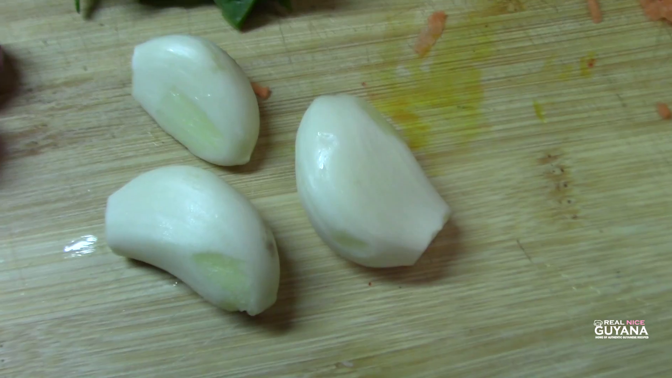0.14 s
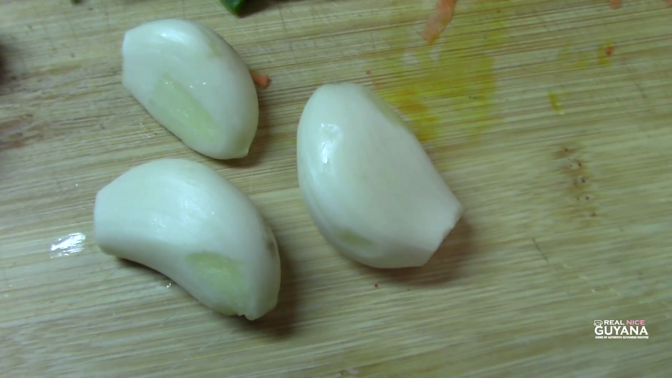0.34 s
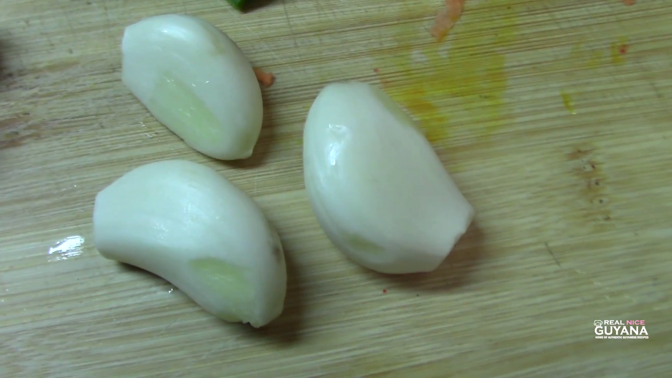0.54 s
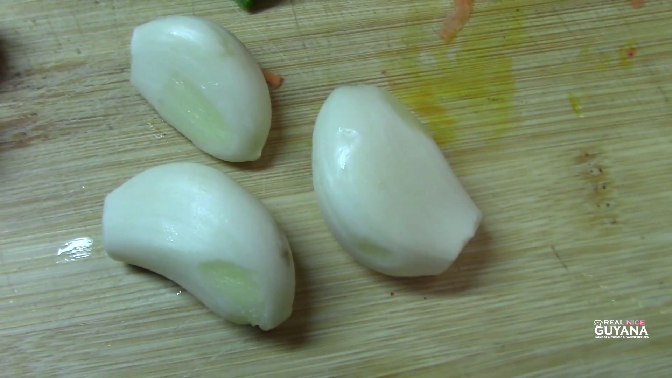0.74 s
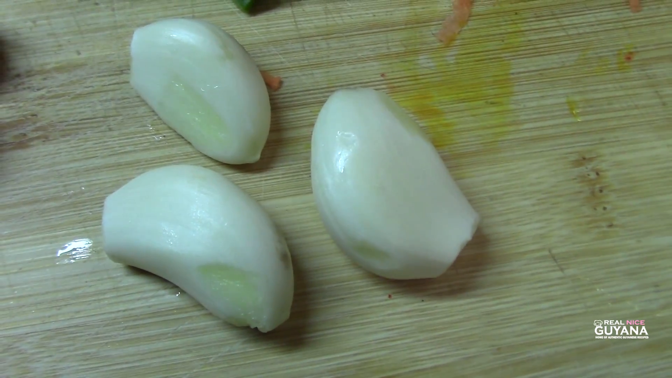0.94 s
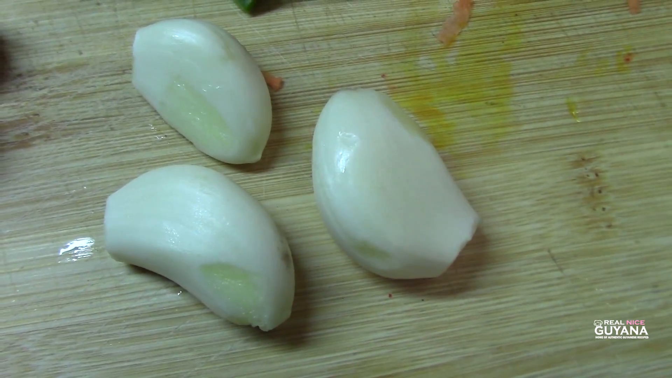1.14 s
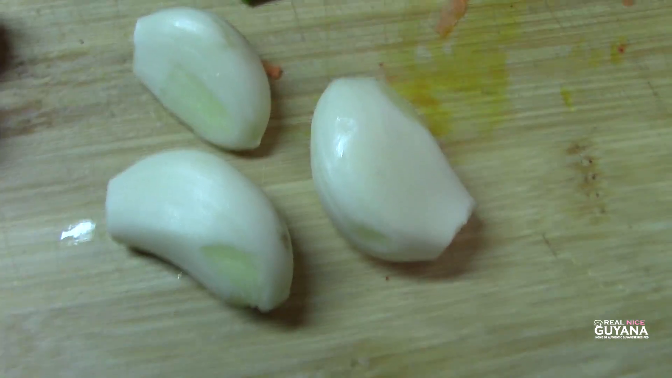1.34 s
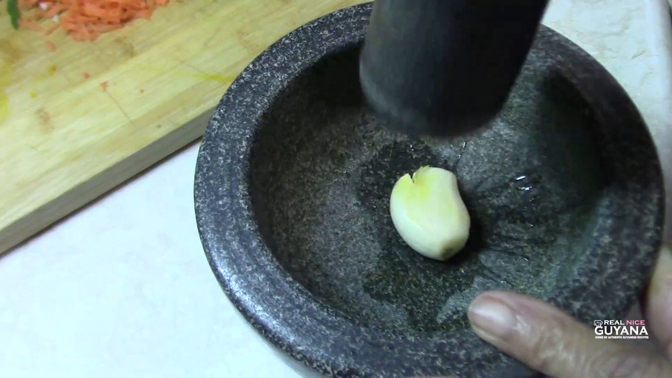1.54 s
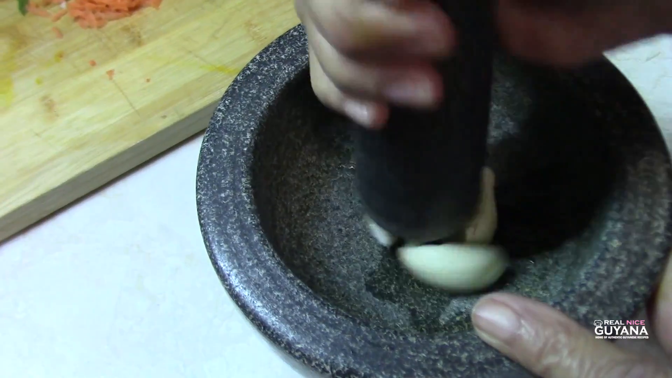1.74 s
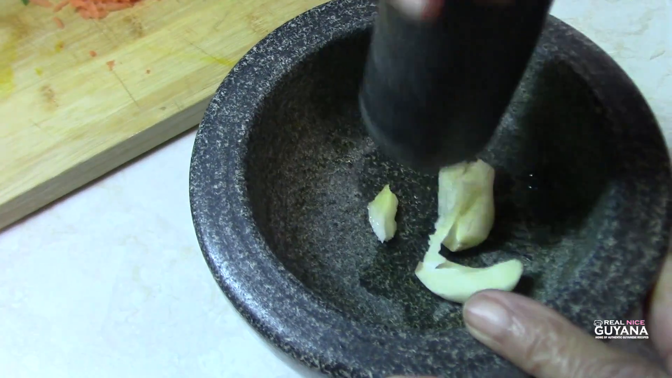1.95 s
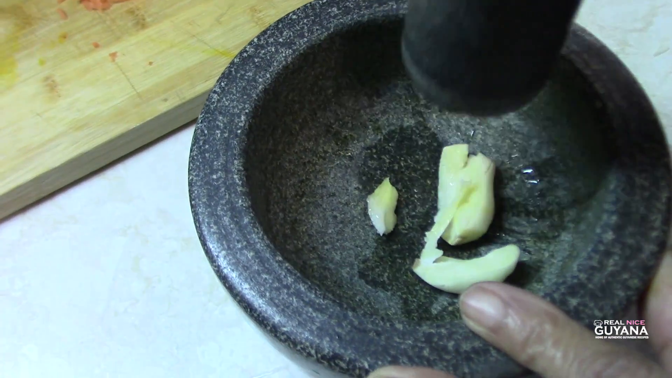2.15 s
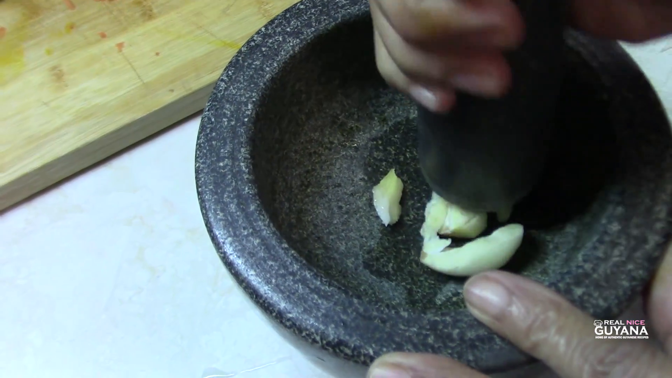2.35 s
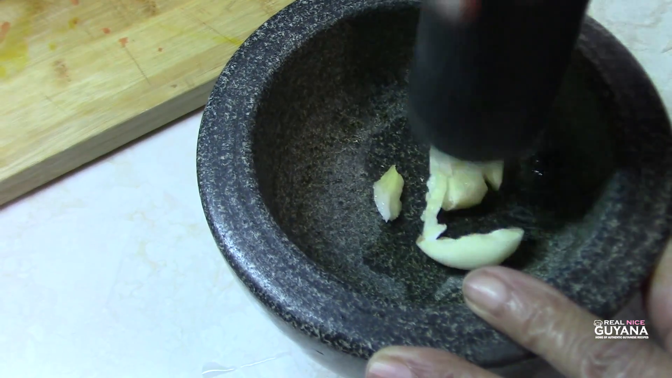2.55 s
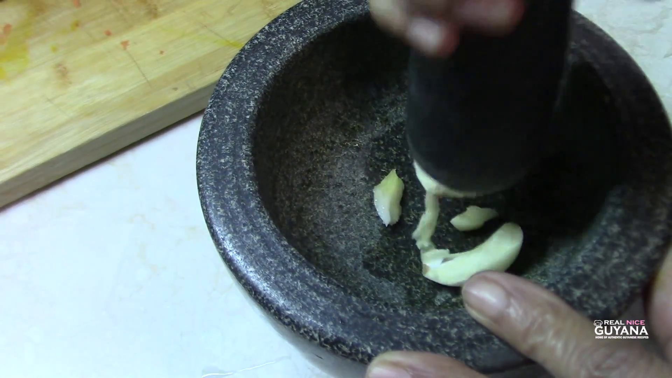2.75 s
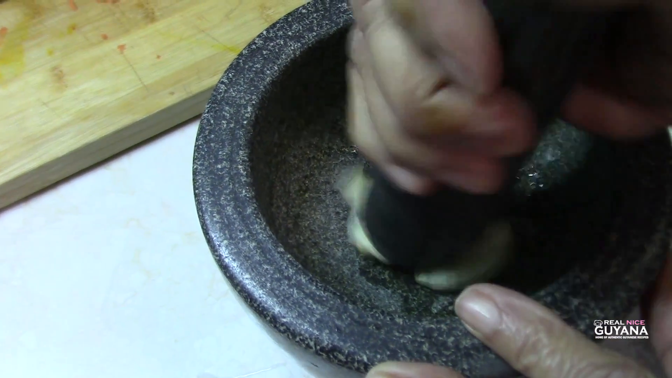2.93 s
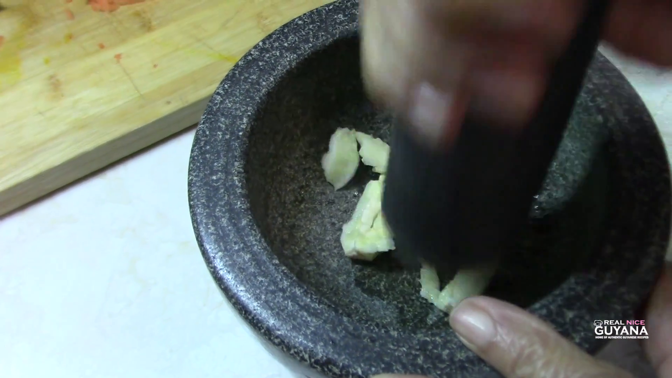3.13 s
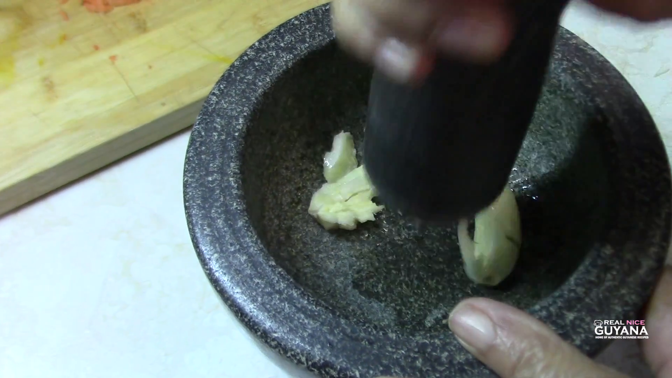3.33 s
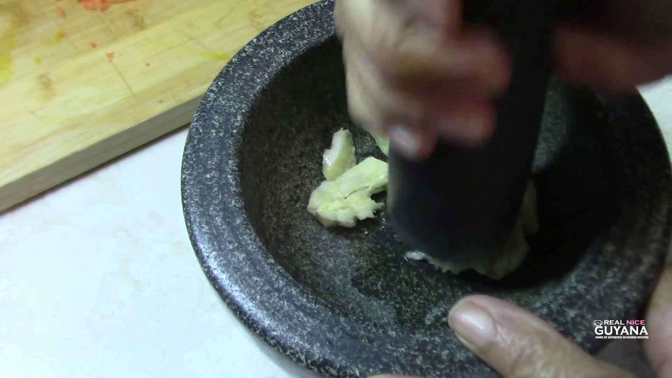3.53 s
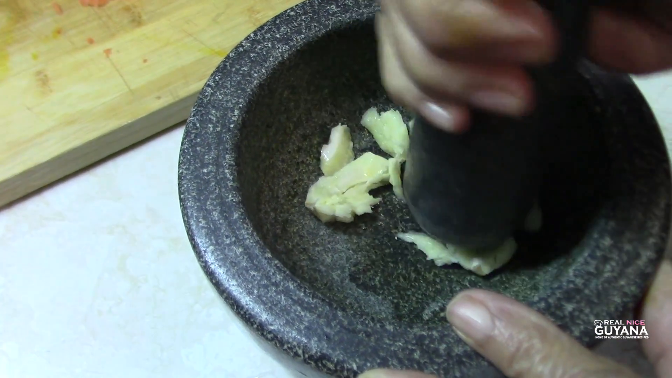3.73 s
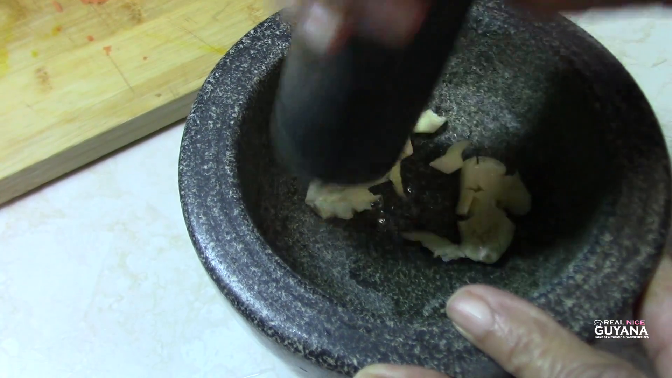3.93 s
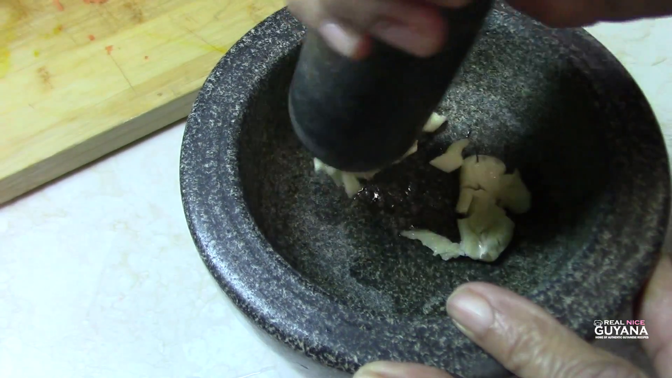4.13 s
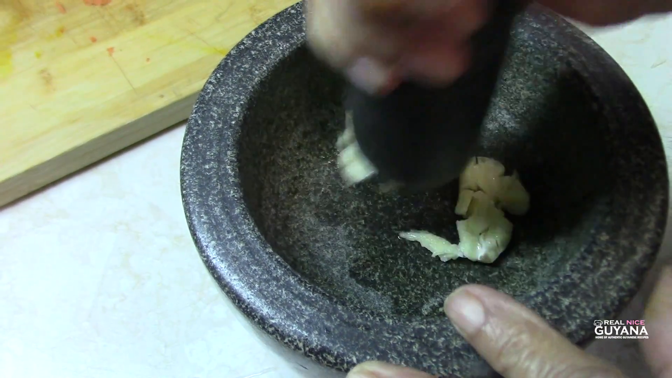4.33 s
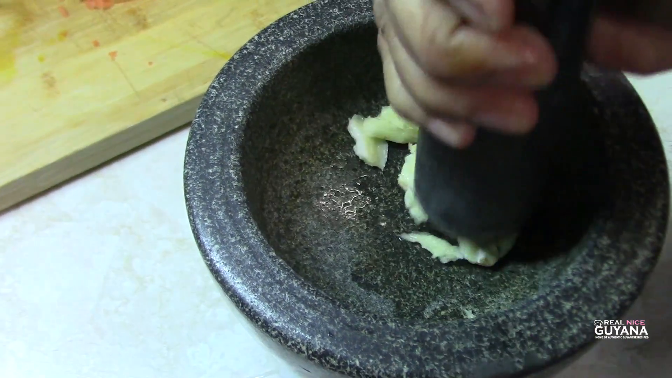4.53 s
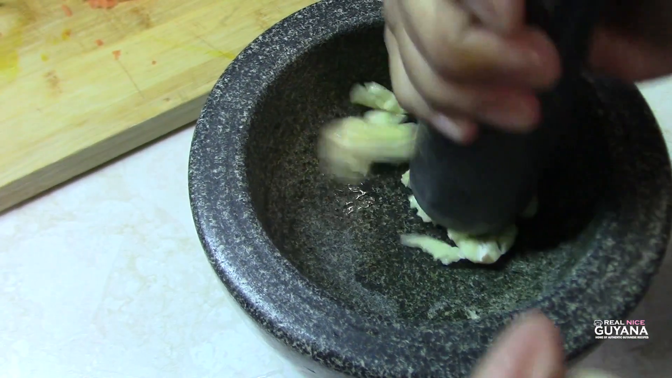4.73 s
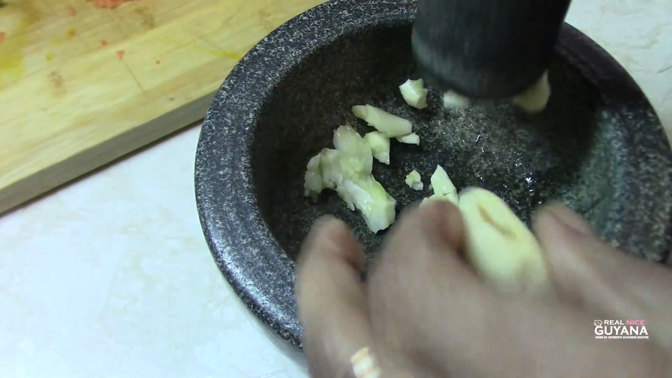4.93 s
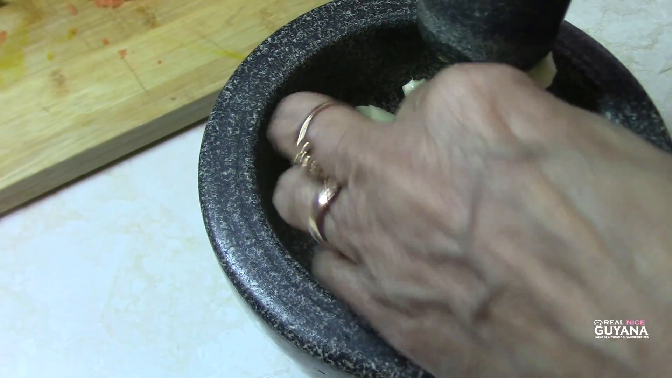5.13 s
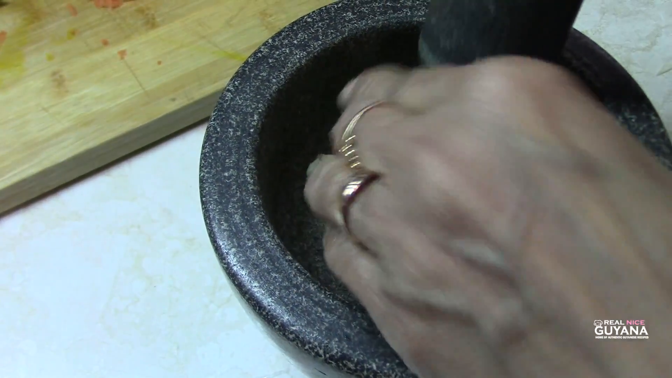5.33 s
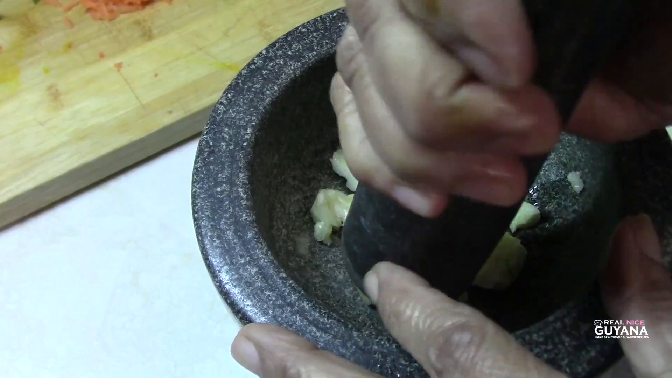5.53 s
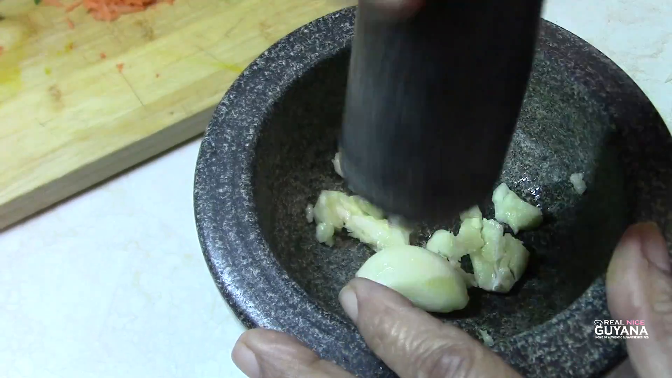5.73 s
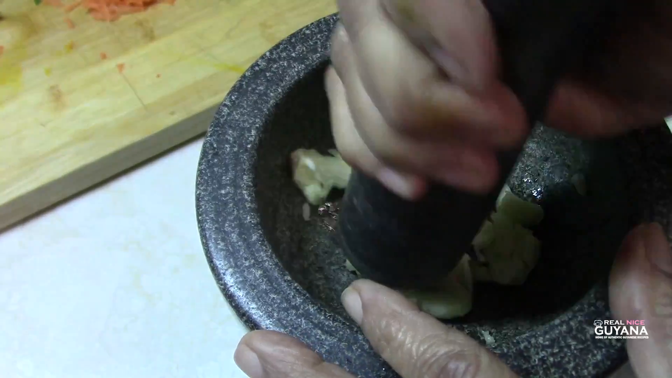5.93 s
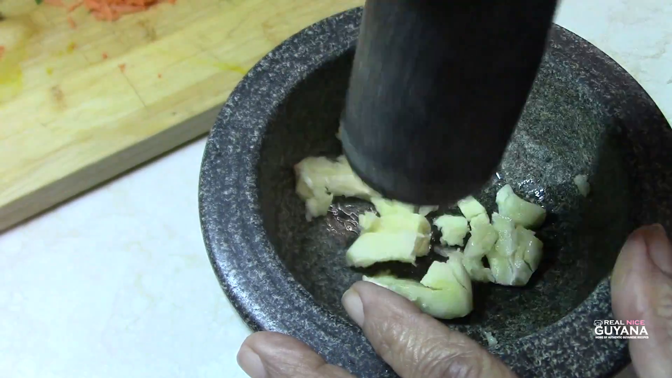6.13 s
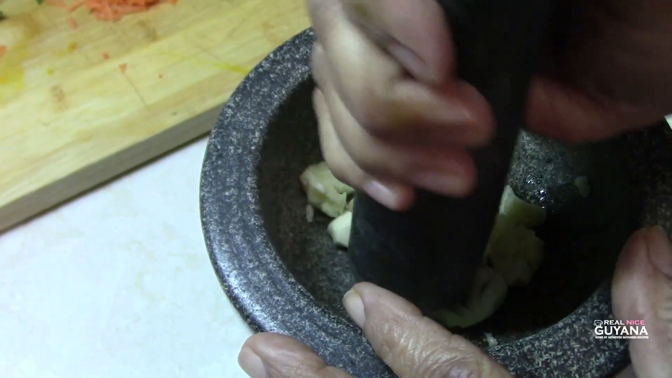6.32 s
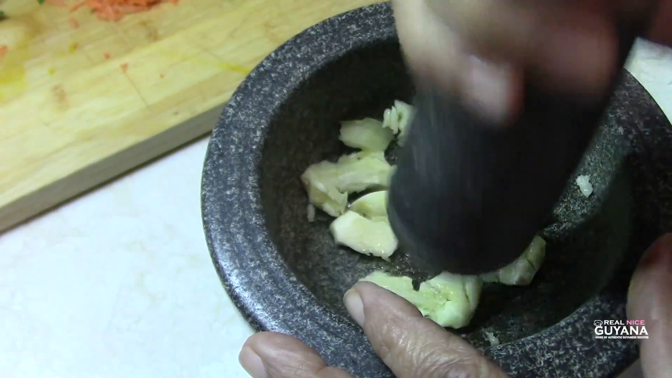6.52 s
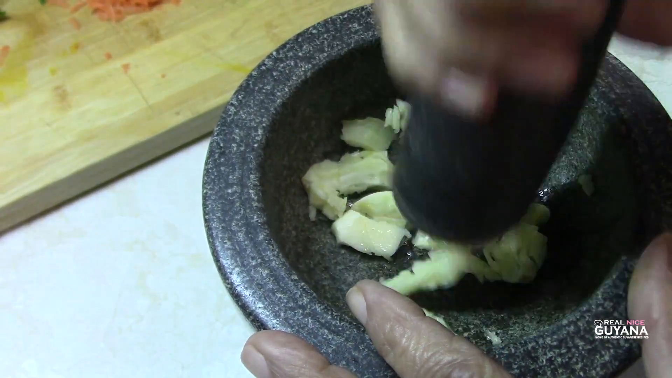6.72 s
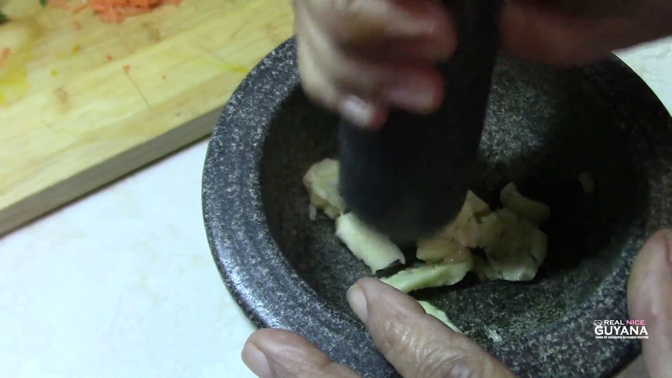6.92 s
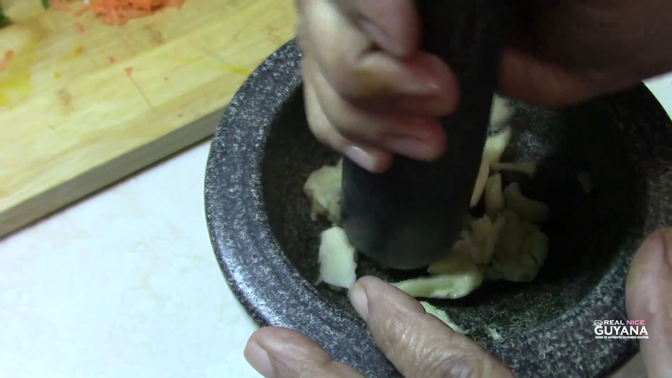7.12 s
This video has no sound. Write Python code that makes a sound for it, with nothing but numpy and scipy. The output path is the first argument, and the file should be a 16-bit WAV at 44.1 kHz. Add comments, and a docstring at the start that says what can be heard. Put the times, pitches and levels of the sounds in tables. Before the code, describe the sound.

A low kitchen hum runs throughout. For the first second and a half there are only small taps and, at about 0.5 seconds, a faint distant utensil clink. At 1.5 seconds a stone scrape starts abruptly, close to the microphone. From 1.8 seconds a stone pestle pounds garlic in a stone mortar roughly three times a second, with a slightly longer gap after the first blow. Each blow combines a crisp crack of pulp, a stone knock, a thud through the worktop and a short fading squelch, with a little dull room reverberation. Between blows the pestle drags grittily and makes the bowl ring briefly. Pulp crackles and a finger ring tinkles very faintly now and then. The pounding pauses after 4.8 seconds, and one dull knock on the worktop sounds at 5.4. Five more blows follow from 5.6 to about 7 seconds.

```python
"""Garlic pounded in a stone mortar on a kitchen worktop, close to a camera microphone.
The room hums; small taps and a far clink come first, and a scrape starts abruptly at 1.5 s. From 1.8 s
the stone pestle falls about three times a second: each blow cracks pulp, knocks stone, thuds into the
worktop and squelches away, and between blows the pestle drags and makes the bowl sing. Pulp crackles and
a finger ring tinkles. In a pause at 5.4 s comes one dull knock on the worktop, then five more blows."""
import sys
import numpy as np
from scipy import signal
from scipy.fft import rfft, irfft, next_fast_len
from scipy.io import wavfile
from scipy.ndimage import uniform_filter1d

SR = 44100
rng = np.random.default_rng(int(sys.argv[2]) if len(sys.argv) > 2 else 0)


def materialize(psi):
    """Save the field psi as 16-bit PCM at rate SR to the path in sys.argv[1].

    A 1-D psi becomes a single channel; in a 2-D psi each row is a channel.
    """
    bounded = np.clip(np.atleast_2d(psi).T, -1, 1)
    quanta = np.round(bounded * 32767).astype(np.int16)
    wavfile.write(sys.argv[1], SR, quanta)


N = 316197


def undb(db):
    return 10 ** (np.asarray(db) / 20)


def unit(x):
    return x / np.sqrt(np.mean(x ** 2))


def noise():
    return rng.standard_normal(N)


def colour(points):
    """Noise of rms 1 with a spectrum of (Hz, dB) points."""
    hz, db = np.transpose(points)
    size = next_fast_len(N)
    gain = undb(np.interp(np.log(np.arange(size // 2 + 1) * SR / size + 1), np.log(hz), db))
    return unit(irfft(rfft(rng.standard_normal(size)) * gain, size)[:N])


def band(x, hz, width, passes=1):
    """Two-pole resonance, gain 1 at the centre; more passes steepen it."""
    for _ in range(passes):
        x = signal.lfilter(*signal.iirpeak(hz, hz / width, SR), x)
    return x


def butter(x, order, hz, kind):
    return signal.sosfilt(signal.butter(order, hz, kind, fs=SR, output="sos"), x)


def flutter(rate, db):
    """Gain that wavers rate times a second."""
    step = int(SR / rate)
    steps = np.repeat(rng.standard_normal(N // step + 1), step)
    return undb(db * unit(uniform_filter1d(steps, step)[:N]))


def add(track, s, db, shape):
    """Lay a shape on a track from time s."""
    i = int(s * SR)
    track[i:i + len(shape)] += undb(db) * shape[:N - i]


def swell(rise_s, hold_s, t60):
    """Envelope: rounded rise, hold, exponential fall."""
    t = np.arange(int((rise_s + hold_s + t60) * SR)) / SR
    rise = np.sin(np.pi / 2 * np.clip(t / rise_s, 0, 1)) ** 2
    return rise * undb(-60 * np.clip(t - rise_s - hold_s, 0, None) / t60)


def strike(modes):
    """Free ring of (Hz, dB, t60) modes, each with its own phase."""
    t = np.arange(SR // 2) / SR
    return sum(undb(db - 60 * t / t60) * np.sin(2 * np.pi * (hz * t + rng.random()))
               for hz, db, t60 in modes)


# The pestle, close to the microphone: first the abrupt start of a scrape, then sixteen blows.
# Each row: start and crack length in seconds, crack level, brightness and knock level in dB,
# thud delay in seconds, thud and squelch levels in dB, give before the crack in seconds,
# bass level in dB, thud t60 in seconds, strongest crack pitch in Hz. Levels are relative.
CONTACTS = [(1.533, 0.0048, -42.5, -11, -31.5, 0.0049, -34.5, -52, 0.0011, -44, 0.15, 5680),
            (1.7894, 0.0031, -4.5, 0, -14.5, 0.011, -21.5, -39.5, 0.0032, -25, 0.12, 5600),
            (2.4087, 0.0033, -5, 2.5, -28.5, 0.011, -30, -36, 0.0039, -35, 0.19, 3500),
            (2.714, 0.0034, -4.5, -17, -15, 0.02, -16, -37.5, 0.0051, -25, 0.11, 5200),
            (3.0398, 0.0059, -13.5, 10.5, -17, 0.0031, -34, -41, 0.0073, -38.5, 0.19, 8400),
            (3.294, 0.01, -16.5, -1, -18.5, 0.0033, -37, -45, 0.0096, -34, 0.13, 3370),
            (3.583, 0.0055, -10, 6, -25, 0.0055, -29, -43.5, 0.0055, -36.5, 0.15, 6640),
            (3.8151, 0.0068, -19, 14, -35, 0.0085, -32.5, -43, 0.0053, -37, 0.098, 8850),
            (4.098, 0.0016, -13.5, -11.5, -6.5, 0.019, -16.5, -43.5, 0.007, -27.5, 0.11, 6300),
            (4.3362, 0.0028, -7.5, 7.5, -28, 0.028, -19, -39.5, 0.014, -26.5, 0.063, 7600),
            (4.583, 0.0074, -13, 10, -39.5, 0.016, -20, -44, 0.01, -28.5, 0.038, 7020),
            (4.833, 0.0048, -11.5, 11.5, -19, 0.018, -18, -41, 0.025, -25, 0.097, 7100),
            (5.6264, 0.0056, -24, 2.5, -21.5, 0.011, -29.5, -55.5, .001, -35.5, 0.13, 5220),
            (6.02, 0.0047, -11.5, 9, -16.5, 0.0049, -36.5, -35.5, 0.0024, -39.5, 0.42, 10370),
            (6.3711, 0.0027, -5, 0.5, -22.5, 0.004, -34.5, -37.5, 0.0031, -37.5, 0.2, 9000),
            (6.694, 0.006, -16, 21, -22.5, 0.014, -23, -40.5, 0.007, -31, 0.1, 9630),
            (6.9619, 0.0041, -9, 5.5, -24.5, 0.0078, -37, -46.5, 0.0051, -31, 0.13, 5600)]
# Spectrum of the crack. Each row: frequency in Hz, relative level in dB.
CRACK_SPECTRUM = [(880, -47.5), (1500, 0.5), (2940, -3.5), (5640, 0.5), (6820, 1), (9040, 3), (10600, 4),
                  (14300, -10.5), (16500, -26.5)]


def pulp_crack():
    """Under a blow the clove gives way, then fibres burst in clumps, strongest in one band."""
    body, bright = np.zeros((2, N))
    for s, length, db, tilt_db, *_, give_s, _, _, _ in CONTACTS:
        give = swell(0.001, 0, 2 * give_s)[::-1]
        add(body, s - len(give) / SR, db - 18, give)
        rise_s = 0.61 * length
        add(body, s, db - tilt_db / 2, swell(rise_s, length - rise_s, 0.0017))
        add(bright, s, db + tilt_db / 2, swell(rise_s, length - rise_s, 0.0086))
    low, high = (unit(butter(colour(CRACK_SPECTRUM), 2, 7000, kind)) for kind in ("low", "high"))
    burst = (body * low + bright * high) * flutter(1200, 6.06) * undb(-9)
    out = burst.copy()
    for s, *_, hz in CONTACTS:
        start = s - .02
        add(out, start, 3, band(burst[int(start * SR):][:SR // 8], hz, 0.14 * hz))
    return out


def stone_knock():
    """Stone meets stone partway through each crack."""
    envelope = np.zeros(N)
    for s, length, _, _, knock_db, *_ in CONTACTS:
        add(envelope, s + 0.67 * length - .001, knock_db, swell(0.00093, 0.00028, 0.022))
    return envelope * unit(band(noise(), 1200, 2400, passes=2))


# Spectrum of the wet pulp. Each row: frequency in Hz, relative level in dB.
SQUELCH_SPECTRUM = [(1500, -20), (2800, -3), (4200, -1.5), (6900, 0.5), (10000, -2.5), (15400, -5),
                    (16100, -27)]


def squelch(pops_per_s=190, pop_db=-16.5):
    """Pulp bubbles unevenly after each contact, and air pockets pop at random as it settles."""
    wet = np.zeros(N)
    for s, length, crack_db, _, _, _, _, wet_db, *_ in CONTACTS:
        add(wet, s, wet_db, swell(0.0071, 0.0069, 0.25))
        add(wet, s, crack_db - 19, swell(0.0013, length, 0.036))
    pulp = colour(SQUELCH_SPECTRUM)
    bubbles = sum(band(pulp, hz, 0.81 * hz) * flutter(260, 4.5) for hz in (2230, 4420, 7500, 12370))
    pockets = (rng.random(N) < pops_per_s / SR) * rng.exponential(size=N)
    pops = signal.fftconvolve(pockets, swell(0.0005, 0, 0.0032))[:N]
    pops *= np.sqrt(wet * wet.max())  # pops outlast the bubbling
    return wet * bubbles + undb(pop_db) * pops * unit(butter(pulp, 3, 7000, "high"))


# The worktop under the mortar. Each row: mode frequency and width in Hz, relative level in dB.
WORKTOP_MODES = [(108, 40, -17), (213, 16, -10), (277, 88, 4.5), (354.5, 33, 1.5), (444, 32, -2),
                 (581, 140, -0.5), (722.5, 90, -0.5), (856.4, 57, 2), (1600, 230, -25), (1990, 760, -17)]


def worktop_thud():
    """The worktop rattles in a few uneven pushes just after each contact; its bass rings longest."""
    thud, bass = np.zeros((2, N))
    for s, _, _, _, _, delay_s, thud_db, _, _, bass_db, t60, _ in CONTACTS:
        add(thud, s, thud_db, swell(delay_s, 0.0008, 2 * t60) ** 2)
        add(bass, s, bass_db, swell(delay_s, 0.0008, 2 * (t60 + 0.051)) ** 2)
    push = butter(noise() * flutter(300, 3.8), 4, (70, 2600), "band")
    push /= np.sqrt(uniform_filter1d(push ** 2, SR // 40))  # keep only the fast lumps
    out = np.zeros(N)
    for hz, width, db in WORKTOP_MODES:
        mode = band(push * (bass if hz < 500 else thud), hz, width)
        out += undb(db - 18) * mode * np.sqrt(SR / width)
    return out


# Short drags of the pestle, in the opening scrape and after blows.
# Each row: start and hold in seconds, relative levels of the upper and lower ring in dB.
STROKES = [(1.534, 0.016, -28.5, -28), (1.582, 0.052, -36, -44), (1.683, 0.067, -48, -49),
           (1.813, 0.081, -38.5, -34.5), (1.927, 0.053, -35, -41.5), (2.459, 0.018, -39, -47.5),
           (2.487, 0.09, -53, -54), (2.767, 0.017, -32, -42), (2.838, 0.063, -49, -66.5),
           (3.1, 0.022, -36.5, -41), (3.164, 0.02, -41.5, -45.5), (3.344, 0.047, -38.5, -43),
           (3.448, 0.02, -48, -63.5), (3.656, 0.05, -45.5, -45), (3.768, 0.017, -56.5, -48),
           (3.859, 0.033, -42.5, -48.5), (4.153, 0.05, -35, -42.5), (4.365, 0.02, -35, -42),
           (4.454, 0.014, -38.5, -52.5), (4.649, 0.018, -50, -48.5), (4.862, 0.066, -41.5, -46),
           (5.663, 0.021, -40.5, -42), (5.7, 0.057, -48.5, -51), (6.051, 0.01, -35.5, -41),
           (6.091, 0.0041, -32, -50), (6.179, 0.011, -42, -53), (6.433, 0.014, -46.5, -43.5),
           (6.493, 0.0072, -46.5, -56.5), (6.736, 0.008, -41, -50), (6.995, 0.031, -33, -37)]
# The stone bowl. Each row: mode frequency and width in Hz, relative level in dB.
BOWL_MODES = [(845, 30, -21), (978, 16, -4), (2244, 14, -1), (2641, 26, -16), (4105, 30, -20),
              (6280, 60, -32)]


def pestle_drag():
    """Gritty friction feeds the bowl's modes; where the pestle rubs decides which ring is stronger."""
    upper, lower, touchdown = np.zeros((3, N))
    for s, hold_s, upper_db, lower_db in STROKES:
        add(touchdown, s, upper_db - 12, swell(0.0013, 0.001, 0.027))
        add(upper, s, upper_db, swell(0.013, hold_s, t60=0.12))
        add(lower, s, lower_db, swell(0.033, hold_s, t60=0.51))
    grit = unit(band(noise(), 1000, 1900, passes=3)) * flutter(120, 1.0)
    out = (undb(-12.5) * upper + undb(-19.5) * lower + touchdown) * grit
    # the ring near 2.6 kHz lingers briefly after each drag
    pole = np.exp(-1 / (.055 * SR))
    lingering = signal.lfilter([1 - pole], [1, -pole], upper)
    for hz, width, db in BOWL_MODES:
        ring = signal.hilbert(band(noise(), hz, width, passes=2), next_fast_len(N))[:N]
        # steady rubbing evens out the ring's size while its phase still wanders
        ring = unit(np.real(ring / (np.abs(ring) + 1e-9) ** 0.8) * flutter(70, 1.2))
        envelope = lower if hz < 1500 else lingering if 2500 <= hz <= 3000 else upper
        out += undb(db) * ring * envelope
    return out


# The knocked worktop. Each row: mode frequency in Hz, relative level in dB, t60 in seconds.
KNOCK_MODES = [(566, -12.5, 0.11), (980, 2, 0.022), (1525, 1, 0.021), (2090, -8, 0.022), (4960, -19, 0.1),
               (6960, -34.5, 0.035)]


def dull_knock(hiss, start_s=5.4385, end_s=5.517):
    """One knock rings and rattles the worktop and is cut short."""
    out = np.zeros(N)
    length = int((end_s - start_s) * SR)
    clack = unit(butter(hiss, 6, (250, 2100), "band"))[:length]
    decay = swell(0.00029, 0, 0.083)[:length] ** 4 + undb(-19.5) * swell(0.001, 0, 0.29)[:length]
    onset = swell(0.0016, length / SR, .01)[:length]
    cutoff = np.clip(np.arange(length)[::-1] / 200, 0, 1)
    add(out, start_s, -12, (strike(KNOCK_MODES)[:length] + clack * decay) * onset * cutoff)
    return out


# Taps and wet crackles at the mortar. Each row: time in seconds, relative level in dB, pitch in Hz.
TAPS = [(0.465, -44, 4190), (0.9424, -40, 2260), (0.987, -39, 2340), (1.037, -40, 1900),
        (1.06, -38.5, 2530), (1.2228, -33.5, 2400), (1.4287, -30, 2350), (1.4458, -34.5, 2180),
        (1.581, -24, 1480), (1.626, -44, 3200), (1.642, -35.5, 3440), (1.66, -38, 2760), (1.921, -30, 1490),
        (2.439, -22, 2090), (3.038, -17, 2530), (6.369, -14.5, 1280)]
CRACKLES = [(0.506, -43, 6310), (0.5501, -45, 6540), (0.956, -35.5, 6800), (2.7652, -36, 9500),
            (2.831, -24, 8600), (2.978, -42, 10400), (3.038, -17, 10520), (3.0818, -19, 6950),
            (3.288, -18, 6700), (4.1416, -18.5, 6130), (7.035, -33, 10000), (4.3982, -33, 11500),
            (4.652, -31, 7760), (4.701, -37, 6600), (4.902, -35, 10300), (5.2491, -35.5, 8640),
            (5.521, -47.5, 11000), (5.59, -43, 10900), (5.6085, -27.5, 7800), (5.621, -38, 8040),
            (5.7602, -47, 11000), (6.4323, -25, 10000)]


def taps_and_crackles(hiss):
    """Fingers and stone tap in narrow bursts of noise; bursting pulp is shorter and broader."""
    taps = [(s, db, hz, 0.4 * hz, .03, .0012) for s, db, hz in TAPS]
    crackles = [(s, db - 1, hz, 0.65 * hz, .014, .0006) for s, db, hz in CRACKLES]
    out = np.zeros(N)
    for s, db, hz, width, t60, rise_s in taps + crackles:
        shape = swell(rise_s, rise_s, t60)
        burst = band(shape * hiss[int(s * SR):][:len(shape)], hz, width)
        burst = band(burst, hz, 2 * width)
        add(out, s - rise_s, db, burst / np.abs(burst).max())
    return out


# A papery rustle, then a squeak with its overtone.
# Each row: start and hold in seconds, level in dB, pitch and width in Hz.
RUBS = [(0.932, .1, -62.5, 10500, 6000), (3.746, 0.031, -35, 1400, 298), (3.747, 0.017, -58, 3120, 300)]


def rubs(hiss):
    """Short rubs sound as fluttering bands of noise."""
    out = np.zeros(N)
    for s, hold_s, db, hz, width in RUBS:
        shape = swell(0.0036, hold_s, 0.096)
        friction = unit(band(hiss, hz, width, passes=2) * flutter(130, 4.8))
        add(out, s, db, shape * friction[int(s * SR):][:len(shape)])
    return out


# Touches of a finger ring. Each row: start in seconds, relative level in dB.
TINKLES = [(1.8692, -54), (2.1086, -58.5), (4.624, -68), (4.899, -54), (5.0744, -57), (6.29, -66.5)]
# The ring and a utensil. Each row: mode frequency in Hz, relative level in dB, t60 in seconds.
FINGER_RING_MODES = [(7050, -5, 0.11), (10450, 3, 0.13), (13940, 5, 0.066), (15700, -5, 0.042)]
UTENSIL_MODES = [(2980, 2.5, 0.039), (4250, -2, 0.11), (6240, -4, 0.066), (9600, -6, .03)]


def tinkles_and_clink():
    """A finger ring tinkles and, further off, a utensil touches something once; both ring freely."""
    out = np.zeros(N)
    for s, db in TINKLES:
        add(out, s, db, strike(FINGER_RING_MODES))
    add(out, s=.4764, db=-46.5, shape=strike(UTENSIL_MODES))
    return out


def kitchen_reverb(near, t60=0.34, level_db=-17.5):
    """The kitchen answers with a dull, dense tail from 10 ms on."""
    t = np.arange(SR // 2) / SR
    tail = butter(noise()[:len(t)], 3, (90, 3370), "band") * undb(-60 * t / t60) * (t > .01)
    return undb(level_db) * signal.fftconvolve(near, tail / np.sqrt(np.sum(tail ** 2)))[:N]


# Room tone of the kitchen. Each row: frequency in Hz, relative level in dB.
ROOM_SPECTRUM = [(40, -10), (125, -28), (180, -7), (300, -6), (500, -1.5), (1150, -9.5), (1600, -16),
                 (4000, -24.5), (13000, -32.5), (16000, -38)]
# An appliance in the background. Each row: pitch and width in Hz, level in dB.
APPLIANCE_TONES = [(296.2, 3.4, -62), (1182, 12, -67)]


def room_hum():
    """Broad room rumble with two wavering appliance tones."""
    tones = sum(undb(db) * unit(band(noise(), hz, width)) for hz, width, db in APPLIANCE_TONES)
    return undb(-53) * colour(ROOM_SPECTRUM) * flutter(3.4, 0.94) + tones


def scene():
    """In mono: the mortar up close, small sounds around it, the kitchen behind."""
    near = pulp_crack() + stone_knock() + squelch() + worktop_thud() + pestle_drag()
    room = kitchen_reverb(near)
    hiss = noise()
    small = taps_and_crackles(hiss) + rubs(hiss) + tinkles_and_clink() + dull_knock(hiss)
    return (near + room + small + room_hum())[None]


def record(dry):
    """The camera thins the bass, rounds the loudest peaks and cuts the top."""
    thin = butter(dry, 2, 105, "high")
    soft = .75 * np.tanh(thin / .75)
    return signal.sosfilt(signal.ellip(10, .2, 90, 16300, fs=SR, output="sos"), soft)


dry = scene()
out = record(dry)
materialize(out)
```